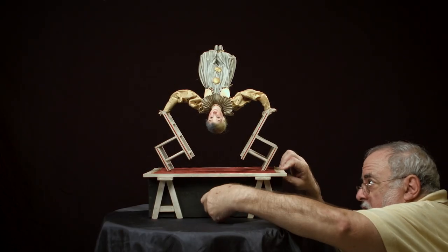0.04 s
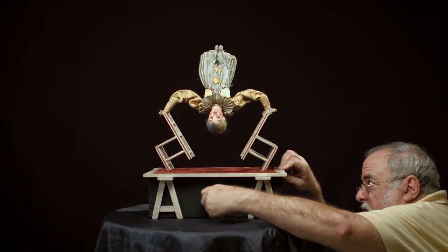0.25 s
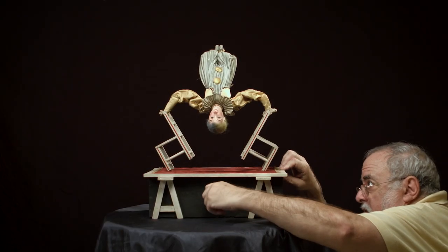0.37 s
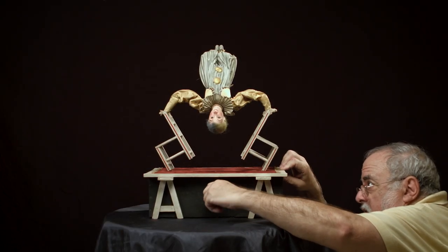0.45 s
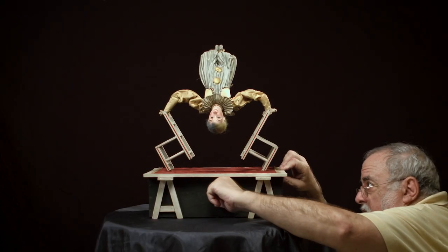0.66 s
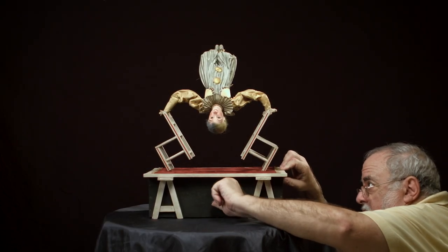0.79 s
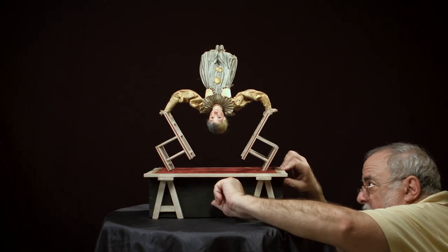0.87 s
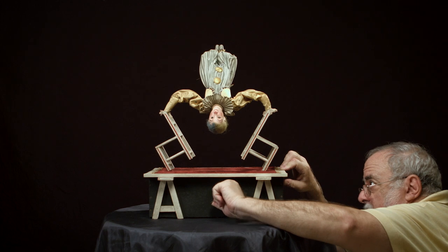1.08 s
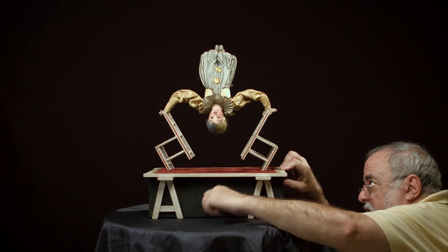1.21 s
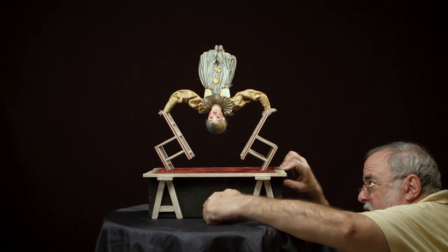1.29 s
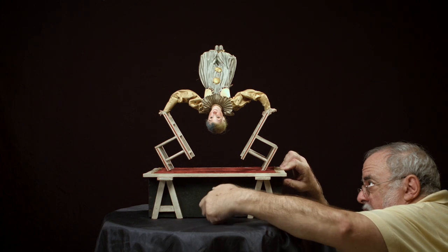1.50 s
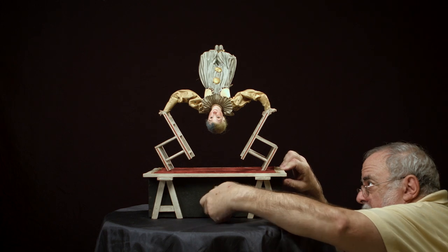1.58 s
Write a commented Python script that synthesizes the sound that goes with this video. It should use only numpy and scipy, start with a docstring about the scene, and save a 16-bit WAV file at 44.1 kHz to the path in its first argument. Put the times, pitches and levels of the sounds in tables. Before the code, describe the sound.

One turn of a winding key on a mechanical figure: a quick run of steel pawl snaps over a wooden case, followed by dull knocks and a brief rustle, heard close in a small, quiet room.

```python
"""Winding a clockwork figure

A clockwork figure is wound by hand in a quiet room: one turn of the key drops the pawl over seven teeth.
Each tooth scrapes (noise), snaps and rebounds, ringing the steel works and the wooden case (decaying modes).
Soft knocks of key and hand are noise bursts over the case modes; the hand rustles and rumbles in swells
of grainy noise, and the wood creaks in wavering sines. Decaying noise makes the reflections and room tail."""
import sys
import numpy as np
from scipy import signal
from scipy.fft import rfft, irfft
from scipy.io import wavfile
from scipy.ndimage import uniform_filter1d

SR = 44100
rng = np.random.default_rng(int(sys.argv[2]) if len(sys.argv) > 2 else 0)


def output_pcm(signal):
    """Save a mono or channel-first signal as 16-bit PCM at the path in sys.argv[1].

    Samples are clipped to [-1, 1] before scaling.
    """
    pcm = np.clip(np.atleast_2d(signal).T, -1, 1) * 32767
    wavfile.write(sys.argv[1], SR, np.round(pcm).astype(np.int16))


N = 72765  # samples, 1.65 s
AGE = np.arange(-256, 7936) / SR  # seconds since the blow, with a short lead-in


def undb(db):
    """Decibels to gain."""
    return 10 ** (np.asarray(db) / 20)


def fade(t, t60):
    """Exponential decay that starts at t = 0 and loses 60 dB in t60 seconds."""
    return (t >= 0) * np.exp(-np.log(1000) * np.maximum(t, 0) / t60)


def unit(x):
    """Scale a response to energy 1."""
    return x / np.sqrt(np.sum(x ** 2))


def through(x, response):
    """Pass a sound through an impulse response."""
    return signal.fftconvolve(x, response)[:len(x)]


def shape(x, gain_at):
    """Minimum-phase filter whose gain is a function of frequency, so nothing sounds ahead of its cause."""
    size = 4096
    hz = np.maximum(np.fft.rfftfreq(size, 1 / SR), 1)
    cepstrum = irfft(np.log(np.maximum(gain_at(hz), 1e-5)))
    # Folding the cepstrum forward in time gives the minimum phase.
    cepstrum[1:size // 2] *= 2
    cepstrum[size // 2 + 1:] = 0
    response = irfft(np.exp(rfft(cepstrum)))
    return through(x, response[:size // 2])


def colour(x, points):
    """Filter through (Hz, dB) points, joined by lines over log frequency."""
    hz, db = np.array(points, float).T
    return shape(x, lambda f: undb(np.interp(np.log(f), np.log(hz), db)))


def noise(points, size=N):
    """Coloured noise of rms 1."""
    x = colour(rng.standard_normal(size), points)
    return x / x.std()


def above(f, hz):
    """Smooth step from 0 to 1 around a frequency."""
    return 1 / (1 + (hz / f) ** np.pi)


def ring(t, modes):
    """Decaying cosine modes struck at t = 0, each cut off after twice its t60."""
    out = np.zeros(len(t))
    for hz, db, t60 in modes:
        live = slice(*np.searchsorted(t, [0, 2 * t60]))
        tone = np.cos(2 * np.pi * hz * t[live])
        out[live] += undb(db) * tone * fade(t[live], t60)
    return out


def add(out, at, sound):
    """Mix a short sound in so that its age 0 falls at the given time."""
    start = int(round((at + AGE[0]) * SR))
    part = out[start:start + len(sound)]
    part += sound[:len(part)]


# Colour of the air in the quiet room. Each row: frequency in Hz, relative level in dB.
AIR_COLOUR = [(25, -16), (60, -3.5), (110, 2.5), (220, -3.5), (500, 0.5), (800, -5.5), (1500, -8.5),
              (3000, -13), (8000, -18), (16000, -20)]


def air(level_db=-73):
    """Steady, faint broadband noise of the air."""
    return undb(level_db) * noise(AIR_COLOUR)


# Colour of the reflections, for table and room. Each row: frequency in Hz, relative level in dB.
REFLECTION_COLOUR = [(60, -4), (200, 8), (500, -1.5), (1000, 2), (2500, 1), (5000, -3.5), (9000, -7),
                     (16000, -12)]
# Decay of the room by band. Each row: band centre in Hz, t60 in seconds.
ROOM_DECAY = [(150, 1), (700, 0.21), (2500, 0.23), (7000, 0.21), (15000, .16)]


def room(level_db=-19.5, delay_s=0.014, size=16384):
    """Impulse response of the room: noise bands that start after a delay, each dying at its own rate."""
    t = np.arange(size) / SR
    hz, t60 = np.array(ROOM_DECAY, float).T
    white = rfft(rng.standard_normal(size))
    f = np.maximum(np.fft.rfftfreq(size, 1 / SR), 1)
    tail = np.zeros(size)
    for band, decay in zip(np.eye(len(hz)), t60):
        weight = np.interp(np.log(f), np.log(hz), band)  # overlapping triangles over log frequency
        tail += irfft(white * weight) * fade(t - delay_s, decay)
    return colour(undb(level_db) * unit(tail), REFLECTION_COLOUR)


def table(level_db=-10.5, t60_s=0.077, delay_s=.0015, size=4096):
    """Quick reflections off case and table top: a short burst of decaying noise."""
    burst = rng.standard_normal(size) * fade(np.arange(size) / SR - delay_s, t60_s)
    return colour(undb(level_db) * unit(burst), REFLECTION_COLOUR)


def rubbing(t, swells, spectrum, grain_db, split_hz=2200):
    """Friction noise that catches and slips, its level wandering at two speeds, in soft bell-shaped swells."""
    quick = uniform_filter1d(rng.standard_normal(N), size=70)
    slow = uniform_filter1d(rng.standard_normal(N), size=400)
    grain = undb(grain_db * (quick / quick.std() + slow / slow.std()))
    friction = grain * noise(spectrum)
    out = np.zeros(N)
    for at, half, db, treble_db in swells:
        swell = friction * np.exp(-((t - at) / half) ** 2)
        out += shape(swell, lambda f: undb(db + treble_db * above(f, split_hz)))
    return out


# Rumbles of the case under the hand. Each row: centre in seconds, half length in seconds, level in dB,
# treble tilt in dB.
CASE_RUMBLES = [(0.342, 0.063, -56.5, 2), (0.739, 0.038, -53.5, 8), (1.024, 0.23, -61, -5),
                (1.352, 0.032, -60.5, 3.5)]
# Colour of the rumble. Each row: frequency in Hz, relative level in dB.
RUMBLE_COLOUR = [(30, -34.5), (50, -25), (72, -8.5), (110, -7.5), (175, 4.5), (280, -7.5), (420, -2),
                 (700, -20), (2000, -44.5)]


def rumbles(t):
    """The case rumbles under the hand: low friction noise with a mild grain."""
    return rubbing(t, CASE_RUMBLES, RUMBLE_COLOUR, grain_db=0.97)


# Rustles of hand and sleeve. Each row: centre in seconds, half length in seconds, level in dB,
# treble tilt in dB.
HAND_RUSTLES = [(0.151, 0.013, -76, 17.5), (0.201, 0.03, -71, 1.5), (1.362, 0.021, -53, -3),
                (1.389, 0.017, -54.5, -19), (1.461, 0.054, -80.5, 5), (1.61, 0.055, -73.5, 2)]
# Colour of the rustle. Each row: frequency in Hz, relative level in dB.
RUSTLE_COLOUR = [(100, -5.5), (500, -5.5), (1000, -7.5), (2000, -5), (4500, -6.5), (7000, -11),
                 (10000, -11), (16000, -22)]


def rustles(t):
    """Hand and sleeve rub: bright friction noise with a coarser grain."""
    return rubbing(t, HAND_RUSTLES, RUSTLE_COLOUR, grain_db=1.9)


# Faint creaks of the wood under the hand. Each row: centre in seconds, half length in seconds, pitch in Hz,
# glide in Hz per second, level in dB.
WOOD_CREAKS = [(0.427, 0.063, 71, -2, -68), (0.919, 0.032, 426.4, 1, -48), (1.042, .08, 420, -4, -62),
               (1.43, 0.017, 410, 1200, -56.5), (1.464, .06, 543, 300, -68)]


def creaks(t, waver_hz=20, waver_at_hz=420):
    """Wood under strain: swelling sines whose pitch wavers at random, in proportion to the pitch."""
    out = np.zeros(N)
    for at, half, hz, glide, db in WOOD_CREAKS:
        waver = uniform_filter1d(rng.standard_normal(N), size=400)
        waver *= waver_hz * hz / waver_at_hz / waver.std()
        phase = 2 * np.pi * np.cumsum(hz + glide * (t - at) + waver) / SR
        swell = np.exp(-((t - at) / half) ** 2)
        out += undb(db) * np.sqrt(2) * swell * np.sin(phase)
    return out


# Modes of the wooden case. Each row: frequency in Hz, relative level in dB, t60 in seconds.
CASE_MODES = [(176, -10, 0.12), (404, 4, 0.06), (424.4, -7, 0.17), (626, -3.5, .22), (746.7, 3.5, .12),
              (948, 4.5, 0.037), (1079, -3.5, 0.067), (2250, -5.5, 0.18), (2815, -8.5, .13),
              (3000, -12, 0.19)]


def wood(detune=0.0052, scatter_db=3, late_s=0.0032, rise_s=0.0022):
    """The case takes up a blow a little late, each time with its own mix of modes."""
    chance = rng.standard_normal((len(CASE_MODES), 3))
    body = np.zeros(len(AGE))
    for (hz, db, t60), (a, b, c) in zip(CASE_MODES, chance):
        mode = (hz * (1 + detune * a), db + scatter_db * b, t60)
        body += ring(AGE - late_s * abs(c), [mode])
    return body * np.clip(AGE / rise_s, 0, 1)


# Soft knocks of key and hand. Each row: start in seconds, relative level in dB, treble tilt in dB,
# t60 in seconds.
KEY_KNOCKS = [(0.123, -20, -7.5, 0.049), (.283, -12, -2, 0.043), (0.734, -6, 1, 0.037),
              (.912, -33, -8, 0.13), (0.981, -17, -37, 0.046), (1.069, -9.5, 0.5, 0.036),
              (1.127, -18.5, 4, 0.068), (1.145, -16, -14, 0.097), (1.192, -29.5, -15.5, 0.064),
              (1.285, -21, -24.5, 0.074), (1.326, -29.5, -9.5, .05), (1.414, -28, -17, 0.046),
              (1.436, -20, -18.5, 0.027)]
# Colour of the knocks. Each row: frequency in Hz, relative level in dB.
KNOCK_COLOUR = [(50, -19), (170, -1), (450, 13), (700, -3), (1300, 1), (2500, -5.5), (5000, -15),
                (10000, -29), (16000, -35.5)]


def key_knocks(level_db=-26, case_db=-23, split_hz=1900, attack_s=0.0045):
    """Key and hand knock softly: dull bursts of noise that ring the case."""
    out = np.zeros(N)
    attack = np.clip(AGE / attack_s, 0, 1)
    for at, db, treble_db, decay_s in KEY_KNOCKS:
        burst = attack * fade(AGE, decay_s) * noise(KNOCK_COLOUR, len(AGE))
        knock = burst + undb(case_db) * wood()
        add(out, at, shape(knock, lambda f: undb(level_db + db + treble_db * above(f, split_hz))))
    return out


# Light ticks of the pawl. Each row: start in seconds, relative level in dB.
PAWL_TICKS = [(1.071, -25), (1.2372, -32.5)]
# Colour of steel chatter, for ticks and ratchet. Each row: frequency in Hz, relative level in dB.
CHATTER_COLOUR = [(50, -36), (110, -14), (250, -3), (550, -17), (1500, 2.5), (3500, -4.5), (5000, -0.5),
                  (9000, 1.5), (12000, -9), (16000, -17)]


def pawl_ticks(level_db=-18, t60_s=0.0089, low_cut_hz=2500):
    """The pawl settles in two light ticks: thin bursts of steel chatter."""
    out = np.zeros(N)
    for at, db in PAWL_TICKS:
        tick = undb(level_db + db) * fade(AGE, t60_s) * noise(CHATTER_COLOUR, len(AGE))
        add(out, at, shape(tick, lambda f: above(f, low_cut_hz)))
    return out


# Modes of the steel works. Each row: frequency in Hz, relative level in dB, t60 in seconds.
WORKS_MODES = [(370, -19, .03), (755, -13.5, 0.058), (960, -13, .03), (1243, -10, 0.04), (1700, -6, .016),
               (2150, -2, 0.022), (2757, -5.5, .016), (3564, -16.5, 0.042), (4650, -0.5, 0.019),
               (4910, 0.5, 0.013), (6540, -3.5, .011), (8160, 0.5, 0.013), (10100, -7.5, .011),
               (12070, -1.5, .009)]


def strike(age, detune=0.005, scatter_db=0.5):
    """One contact of the pawl; each reaches the modes of the works with its own strength and sign."""
    chance = rng.standard_normal((len(WORKS_MODES), 3))
    out = np.zeros(len(age))
    for (hz, db, t60), (a, b, c) in zip(WORKS_MODES, chance):
        out += np.sign(c) * ring(age, [(hz * (1 + detune * a), db + scatter_db * b, t60)])
    return out


# Pawl drops. Each row: start in seconds, level in dB, bass tilt in dB (applied 1.5 times in the deep bass,
# half in the high treble), treble tilt in dB, rebound lag in ms, tooth pitch in Hz, relative tooth level
# in dB, frame knock pitch in Hz, relative frame knock level in dB.
PAWL_DROPS = [(.2290, -.5, 0.5, 3, 0.7, 4650, -1, 950, -7), (.3270, 1, -4, 4, .8, 8180, -10, 1420, -5),
              (0.4358, -1, 1, 3.5, .85, 3294, 3, 960, -2.5),
              (.5620, -2.5, 3, 2, 0.71, 6720, 2.5, 782, -14.5),
              (.6736, -5, 2.5, 3.5, .8, 8360, -7.5, 945, 0.5),
              (0.7767, 2, -2, -2.5, 0.76, 2150, 6.5, 417, -9.5),
              (0.8833, -3, 3, -6.5, 1.83, 3125, 1.5, 370, -15)]
# Colour of the click as it spreads all round. Each row: frequency in Hz, relative level in dB.
SPREAD_COLOUR = [(60, -30.5), (200, -8), (600, -1.5), (1500, -1), (2500, -1), (5000, -0.5), (9000, -3),
                 (12000, -5), (16000, -13)]
# Colour of the case's recoil thud. Each row: frequency in Hz, relative level in dB.
THUD_COLOUR = [(40, -29.5), (70, -10), (140, -7), (240, -6.5), (370, 2), (520, -9.5), (720, -8),
               (1000, -3.5), (1500, -27), (4000, -59)]
PAWL_DB, CHATTER_DB, CASE_DB, THUD_DB, SPREAD_DB = -23.5, -13, -45.5, -38.5, 3
REBOUND_DB, RATTLE_DB, RATTLE_LAG = -0.5, -7.5, 2.8  # last bounce of the pawl: lag in rebound times
CHATTER_RISE_S, CHATTER_T60_S, SLIDE_S, SLIDE_DB = 0.0011, 0.011, .0022, -25.5
TOOTH_T60_S, FRAME_T60_S, THUD_PEAK_S = .012, 0.034, 0.0047
BASS_HZ, TREBLE_HZ = 900, 5670  # where the tilts turn


def ratchet(low_cut_hz=90):
    """The pawl slides over each tooth, snaps, rebounds and chatters: heard in front, and spread all round."""
    front, around = np.zeros(N), np.zeros(N)
    contact = np.clip(AGE / CHATTER_RISE_S, 0, 1) * fade(AGE, CHATTER_T60_S)
    # The scrape swells before the snap and stops just after it.
    slide = undb(SLIDE_DB) * np.clip(1 + AGE / SLIDE_S, 0, 1) * (AGE < CHATTER_RISE_S)
    recoil = np.maximum(AGE, 0) / THUD_PEAK_S * np.exp(1 - AGE / THUD_PEAK_S)
    impulse = 1. * (AGE == 0)
    spread = undb(SPREAD_DB) * unit(colour(impulse, SPREAD_COLOUR))
    for at, db, bass_db, treble_db, rebound_ms, tooth_hz, tooth_db, frame_hz, frame_db in PAWL_DROPS:
        lag = rebound_ms / 1000
        works = strike(AGE)
        works += undb(REBOUND_DB) * strike(AGE - lag)
        works += undb(RATTLE_DB) * strike(AGE - RATTLE_LAG * lag)
        # Tooth and frame sound on the rebound.
        tooth = 2 * ring(AGE - lag, [(tooth_hz, tooth_db, TOOTH_T60_S)])
        frame = ring(AGE - lag, [(frame_hz, frame_db, FRAME_T60_S)])
        chatter = undb(CHATTER_DB) * (contact + slide) * noise(CHATTER_COLOUR, len(AGE))
        steel = undb(PAWL_DB) * (works + tooth + frame) + chatter
        thud = undb(THUD_DB) * recoil * noise(THUD_COLOUR, len(AGE))
        case = undb(CASE_DB) * wood() + thud

        def tone(f):
            """Level and tilt of this drop."""
            tilt_db = bass_db * (1.5 - above(f, BASS_HZ)) + treble_db * above(f, TREBLE_HZ)
            return above(f, low_cut_hz) * undb(db + tilt_db)

        add(front, at, shape(steel + case, tone))
        add(around, at + lag, shape(spread, tone))
    return front, around


def scene(table_send_db=-4, room_send_db=-8.5):
    """Ratchet and handling with their reflections, over faint air noise; sends set the front's share."""
    t = np.arange(N) / SR
    hand = rustles(t) + rumbles(t) + creaks(t)
    knocks = key_knocks() + pawl_ticks()
    front, around = ratchet()
    off_table = through(undb(table_send_db) * front + around + knocks, table())
    in_room = through(undb(room_send_db) * front + around + knocks + hand, room())
    return (air() + hand + knocks + front + off_table + in_room)[None]


def record(dry, top_hz=16300):
    """A steep elliptic low-pass cuts the top."""
    low_pass = signal.ellip(8, .2, 70, top_hz, fs=SR, output="sos")
    return signal.sosfilt(low_pass, dry)


dry = scene()
out = record(dry)
output_pcm(out)
```